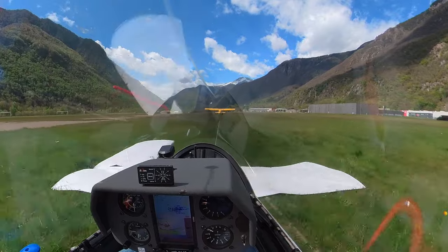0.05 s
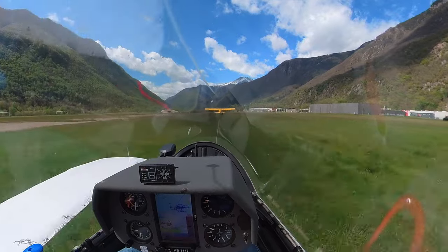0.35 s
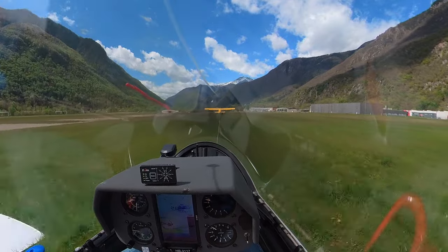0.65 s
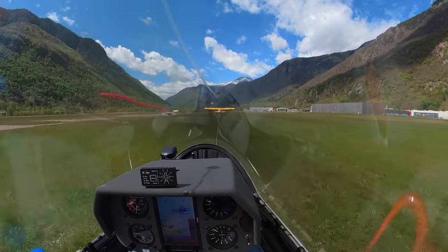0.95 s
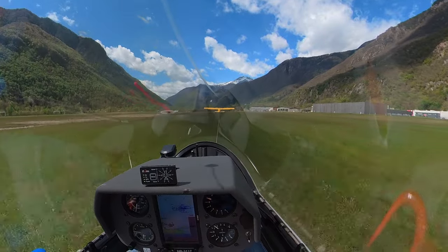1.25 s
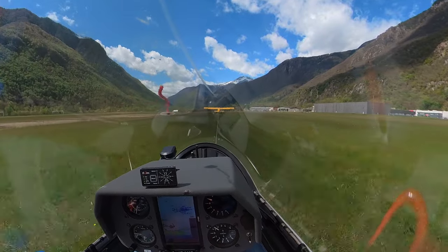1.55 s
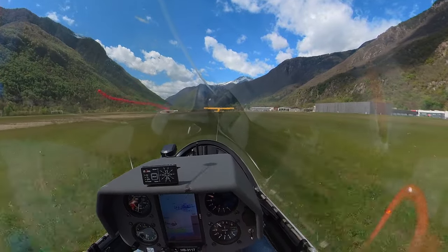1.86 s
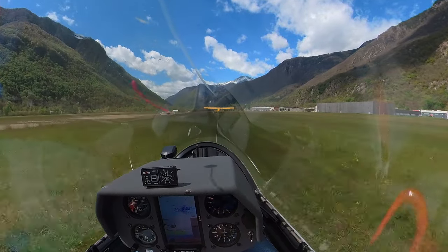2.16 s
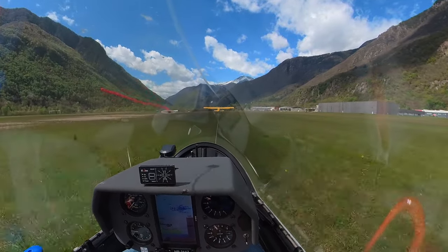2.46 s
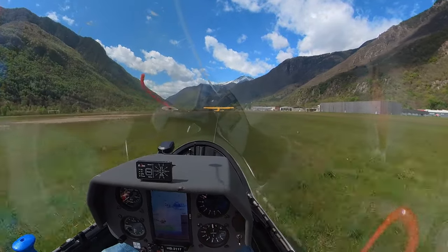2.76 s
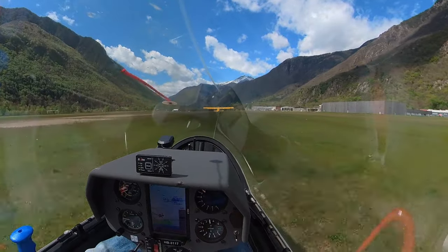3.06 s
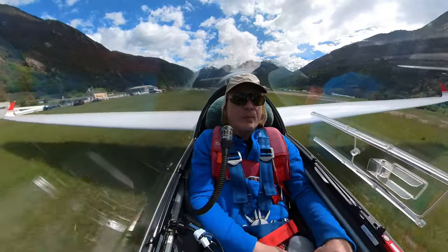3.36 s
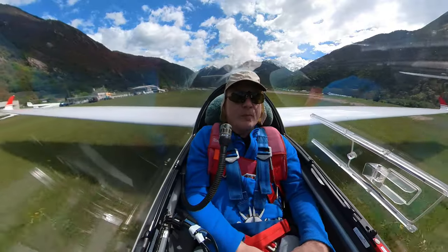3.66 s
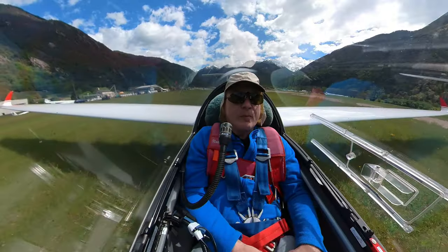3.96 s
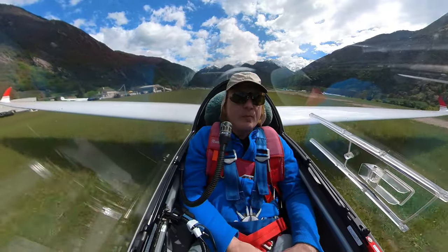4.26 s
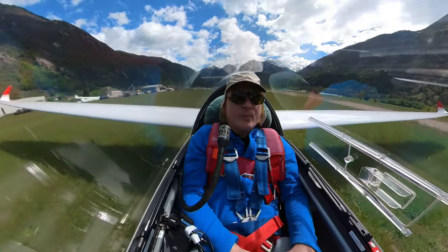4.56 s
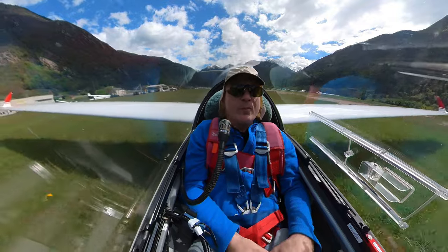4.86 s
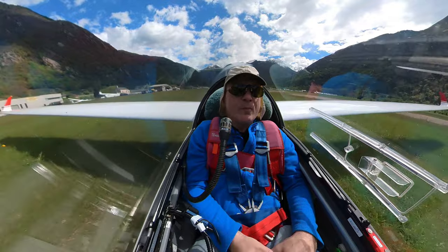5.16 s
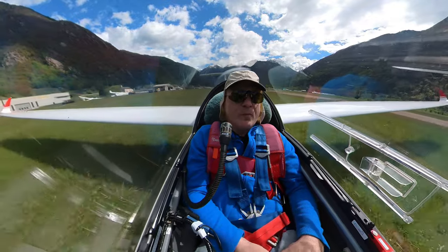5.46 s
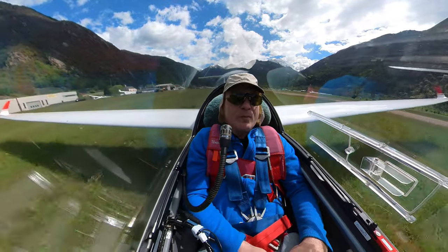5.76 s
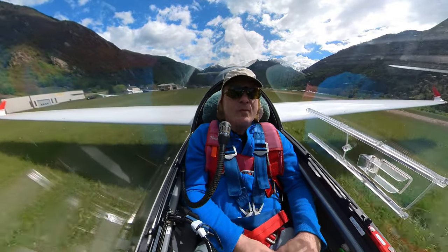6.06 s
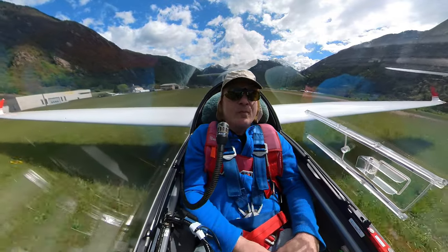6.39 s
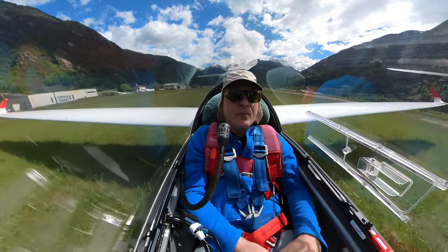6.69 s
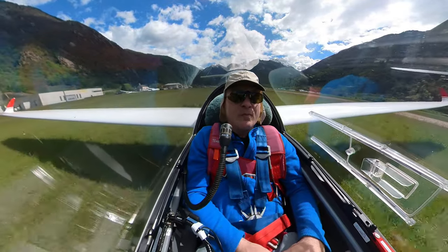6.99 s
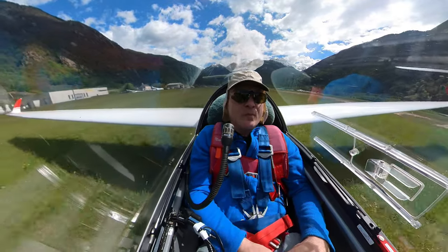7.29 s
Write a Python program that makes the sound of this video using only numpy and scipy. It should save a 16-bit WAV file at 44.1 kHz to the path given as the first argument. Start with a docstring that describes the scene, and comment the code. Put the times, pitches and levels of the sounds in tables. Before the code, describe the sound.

A glider's wheel rumbles and thumps across turf, heard close up from within the closed cockpit. At first the thin body booms while loose trim clatters and metal parts buzz and jingle. A little before halfway the tone becomes hollow, and hard knocks from ruts come thick and fast. Irregular clacks and rattles carry on to the end over a soft airflow that rises a little with speed.

```python
"""A glider's wheel rolls over a grass airfield and shakes the hollow body, which booms and rumbles.
We listen from inside the closed cockpit while the glider is towed. The tyre bounces in ruts,
panels and linkages clack and shake on the bumps, small metal fittings jingle, and the air
rushes more as speed builds. From about three seconds on, the sound is doubled
a few milliseconds late and turns hollow."""
import sys
import numpy as np
from scipy import signal
from scipy.fft import rfft, irfft, next_fast_len
from scipy.io import wavfile
from scipy.ndimage import uniform_filter1d, map_coordinates

SR = 44100
rng = np.random.default_rng(int(sys.argv[2]) if len(sys.argv) > 2 else 0)


def store_pcm(level_fs):
    """Save levels as 16-bit WAV."""
    pcm = np.round(np.clip(level_fs, -1, 1) * 32767).astype(np.int16)
    wavfile.write(sys.argv[1], SR, np.atleast_2d(pcm).T)


N = 323253
CONTACT_S = 0.001  # how quickly a hard touch builds up

# Tone colours, from low to high. Each row: frequency in Hz, relative level in dB.
AIR_TONE = [(100, -4.5), (400, 6.5), (1000, -7.5), (2000, -17.5), (4000, -29), (7000, -45)]  # air over the canopy
JINGLE_TONE = [(2000, -14.5), (3900, -11), (4400, -6), (5200, -11.5), (6100, -8.5), (6900, 0), (7500, -4),
               (9000, -10)]  # small metal parts
ROD_TONE = [(400, -7.5), (700, 11), (1200, -3), (1800, -17), (2700, -8), (3100, -3), (3600, -16),
            (4100, -28.5), (8000, -45)]  # a buzzing control rod
PANEL_TONE = [(300, -26.5), (700, 2.5), (1300, 5), (1600, -1), (2050, 1.5), (2600, -4.5), (3000, -4),
              (4000, -22), (5500, -37.5), (7000, -39)]  # loose panels and trim
KNOCK_TONE = [(150, -32), (350, 3), (650, -6.5), (950, -20.5), (1500, -26.5), (4000, -47.5)]  # the low part of a clack
CLACK_TONE = [(500, -4), (950, 0.5), (1300, 1), (1550, 0), (2050, 5.5), (2500, -3), (3000, -6.5),
              (3550, -6), (4200, -26.5), (9000, -33.5)]  # its middle
SNAP_TONE = [(2000, -22), (3800, 4), (4600, 3), (5500, 1.5), (6800, -2), (9000, -2)]  # its bright top
SHELL_TONE = [(170, -38), (280, 3), (350, -1.5), (480, 1.5), (540, -8), (650, -7), (800, -14.5),
              (1000, -22), (1500, -32.5), (4000, -46)]  # the glider's thin shell
SHELL_RING_TONE = [(270, -18), (322, -0.5), (385, -24.5), (700, -100)]  # the shell's main resonance
HEAVE_TONE = [(8, -23.5), (18, 9), (26, 23.5), (33, 16.5), (41, 31.5), (49, 9), (75, -62.5)]  # the whole airframe moving slowly
THUMP_TONE = [(40, -20.5), (65, 3.5), (85, -5), (105, -1.5), (140, 2), (155, -2), (178, -0.5), (195, -8),
              (220, -10.5), (260, -19), (330, -36), (600, -92.5)]  # the wheel thumping the hull
MICROPHONE_TONE = [(6900, 0), (7600, -7.5), (8400, -16), (9400, -27.5)]  # the microphone's fading treble

# The notes a struck part rings with. Each row: pitch in Hz, level in dB, seconds to fade by 60 dB.
COVER_NOTES = [(830, 1.5, 0.057), (1250, 4, 0.028), (1850, -0.5, 0.025), (2070, -10, .025),
               (2330, -4.5, .022), (2900, -9.5, 0.03), (3550, -8.5, 0.041)]
ROD_NOTES = [(668, 5, 0.16), (1164, 4, 0.088), (2620, -18, .07), (2940, -12, 0.05), (3370, -9, 0.05)]
PANEL_NOTES = [(628, 2.5, 0.13), (891.5, -2.5, 0.28), (1234, -1.5, 0.071), (1920, -10.5, 0.074),
               (2090, -5.5, 0.026), (2400, -12, 0.03), (2780, -6.5, 0.077), (3600, -10, 0.091)]
HULL_NOTES = [(104, -7.5, 0.024), (150, -6, 0.53), (168, 4.5, 0.045), (213.3, -5.5, 0.17), (305, -3, 0.052),
              (485.4, -12.5, 0.16)]

# How loud the lasting sounds are. Each row: time in seconds, level in dB.
AIR_LEVELS = [(0, -62.5), (1.5, -60.5), (3.2, -59.5), (5, -55), (7.3, -57)]
BOOM_LEVELS = [(0.0, -26.5), (0.35, -21), (0.42, -47), (0.52, -24.5), (0.74, -21), (0.77, -46), (0.87, -25),
               (1.58, -23), (1.65, -37), (1.89, -17.5), (1.93, -34), (2.11, -20), (2.21, -32.5), (2.3, -19),
               (2.35, -55), (2.42, -24), (2.47, -42), (2.61, -22), (2.71, -36), (3.12, -24.5)]
HEAVE_LEVELS = [(0, -30), (0.55, -30.5), (0.85, -35), (1, -30.5), (1.5, -47), (1.8, -37.5), (3.6, -32.5),
                (3.85, -30), (4.35, -42), (4.55, -23), (4.76, -65), (4.95, -26), (5.13, -36), (5.45, -26.5),
                (5.7, -38.5), (6.7, -42), (7.05, -30.5), (7.3, -46)]

# Single hits on small parts. Each row: start in seconds, level in dB.
CATCH_TICKS = [(5.903, -45), (5.916, -40)]
FITTING_HITS = [(0.246, -50), (0.464, -43.5), (0.49, -48.5), (0.553, -45.5), (0.7, -59), (0.74, -53),
                (1.087, -38), (1.112, -58), (1.387, -47), (1.766, -49), (3.184, -50.5), (3.207, -54),
                (3.675, -53.5), (4.43, -48), (4.859, -48.5), (4.956, -50.5), (5.311, -47.5), (6.732, -47),
                (6.817, -48.5), (7.055, -63)]
ROD_BUZZES = [(0.226, -36.5), (0.938, -33)]
# A loose cover clatters in runs. Each row: start in seconds, length in seconds, level in dB.
COVER_RUNS = [(0.591, .1, -48.5), (1.859, .035, -43.5), (2.026, .04, -60), (2.128, .018, -43),
              (2.447, .07, -45), (2.558, .03, -35.5), (2.595, .085, -45.5), (2.781, .05, -44),
              (2.885, .03, -57)]
# The loose gear shakes. Each row: start and length in seconds, panel and hard-part levels in dB.
GEAR_SHAKES = [(0.588, 0.17, -70, -73.5), (1.005, .1, -60, -61.5), (2.027, 0.051, -56, -59),
               (2.235, .11, -60.5, -66.5), (2.351, 0.13, -59, -67.5), (2.511, .07, -53.5, -60),
               (2.738, 0.29, -60, -67.5), (3.66, .13, -62.5, -64.5), (4.113, 0.15, -54.5, -64.5),
               (4.409, 0.099, -51.5, -60), (4.555, 0.1, -59, -63.5), (4.823, .16, -56.5, -60.5),
               (5.166, 0.07, -58, -62.5), (5.34, 0.16, -54, -59.5), (5.581, 0.068, -59, -65.5),
               (6.36, 0.13, -58.5, -71.5), (7.008, 0.084, -50.5, -54), (7.152, 0.17, -67.5, -64.5)]
# The loudest clacks of panels and linkages.
# Each row: start in seconds, level in dB, then the dB added to that for the knock and for the snap.
LOUD_CLACKS = [(0.159, -48.5, 22, 0), (0.188, -32.5, -9, -7.5), (0.308, -51, 10.5, -19),
               (0.492, -51.5, 24.5, -13), (0.8634, -44, -11, -4.5), (0.9365, -36, 0, -6),
               (0.953, -40.5, 19, -27), (0.986, -33.5, 14, -8), (1.006, -30.5, 9, -6),
               (1.021, -34.5, -3, -12), (1.0547, -30.5, 4, -12.5), (1.0704, -35, 8, -19),
               (1.141, -46.5, 23, -20), (1.1544, -49, 21, -29), (1.171, -36.5, 8.5, -20),
               (1.276, -46, 20, -37), (1.3427, -44, 17, -17), (1.4601, -47, -7, 0), (1.5963, -40, -18, -3),
               (1.6324, -34.5, 6, -10), (1.7245, -41, 6, -6), (1.8724, -41, 15.5, -20),
               (1.935, -45.5, 13, -12), (1.9919, -42, 6, -24), (2.0426, -43, 2.5, -11),
               (2.1023, -39.5, 17, -12), (2.261, -43, 13, -22), (2.299, -45.5, -4, -5),
               (2.324, -48.5, 1, -7), (2.404, -36.5, 8.5, -9), (2.4795, -47, 25.5, -23),
               (2.5331, -35.5, 13, -15), (2.808, -40.5, 5, -9), (2.941, -43, 18.5, -5.5),
               (3.049, -37, 12, -14.5), (3.2013, -36, 10, -18), (3.2904, -37.5, 15.5, -18),
               (3.3862, -43, 17, -8), (3.413, -41, 21, -27), (3.425, -38, -4, -12),
               (3.5384, -39, 15.5, -6.5), (3.7236, -32.5, 5, -13), (3.9, -45, 11.5, -7),
               (4.065, -40.5, 12, -26), (4.1754, -31, -11, -9), (4.2169, -37.5, 9.5, -19),
               (4.5017, -27, 10, -7.5), (4.9347, -39, 1, -21), (5.3844, -38, 18, -21),
               (5.5214, -43.5, 18, -10), (5.678, -28.5, 6, -12), (5.7244, -46, -5, 1),
               (5.8794, -46.5, 20.5, -9), (5.9754, -41.5, 18, -15), (6.1722, -49.5, 25.5, -18),
               (6.444, -48.5, 24, -19), (6.4911, -41, 15, -22), (6.779, -35.5, 2, -15),
               (6.858, -41.5, 6, -15.5), (7.0586, -40.5, 14, -14), (7.221, -38.5, -1, -16.5)]

# Rolling on even turf. Each row: time in seconds, thump level in dB, rattle level in dB.
EVEN_ROLLING = [(0, -32, -70), (1.5, -29.5, -70), (3.1, -28, -70.5), (4.7, -32.5, -67), (5.6, -28.5, -69),
                (6.3, -28.5, -72), (7.3, -30.5, -64.5)]
# The wheel runs over bumps. Each row: start and length in seconds, thump and rattle levels in dB.
WHEEL_BUMPS = [(0.173, 0.074, -30, -69), (0.431, 0.11, -27, -69), (0.584, .11, -27.5, -58.5),
               (0.929, 0.19, -42, -62), (1.101, 0.14, -35, -71.5), (1.362, 0.029, -31, -68.5),
               (1.576, 0.12, -36, -60), (1.712, 0.12, -31.5, -67), (1.918, 0.25, -32, -65.5),
               (2.276, 0.2, -29, -66.5), (2.478, 0.067, -26.5, -62.5), (2.779, 0.12, -25, -71.5),
               (2.93, 0.13, -41, -61.5), (3.147, 0.11, -29, -65.5), (3.362, 0.066, -33, -73.5),
               (3.685, 0.054, -25.5, -59), (4.126, 0.14, -28.5, -59.5), (4.413, .1, -31.5, -54.5),
               (4.559, 0.078, -27.5, -71.5), (4.801, .15, -26, -60.5), (5.231, 0.067, -30, -75.5),
               (5.358, 0.11, -30.5, -59.5), (5.523, 0.22, -49, -64.5), (5.853, 0.072, -29, -61.5),
               (6.064, 0.078, -33, -63), (6.339, 0.18, -36, -68), (6.676, 0.14, -31.5, -65),
               (7.034, 0.033, -25.5, -54), (7.23, 0.098, -26.5, -69.5)]
# The wheel goes light for a moment. Each row: middle and half length in seconds, dip in dB.
WHEEL_SKIPS = [(0.408, 0.029, -5.5), (1.455, 0.029, -4), (1.896, 0.03, -3.5), (2.171, 0.023, -3),
               (2.672, .03, -2.5), (3.249, 0.016, -5.5), (3.614, 0.067, -1.5), (4.35, 0.026, -3),
               (4.768, 0.028, -5.5), (5.17, 0.016, -5.5), (6, 0.039, -1), (6.627, 0.028, -8)]
# The wheel drops into ruts.
# Each row: start in seconds, hull knock in dB, tyre bounce in dB, bounce pitch in Hz.
WHEEL_RUTS = [(0.447, -41, -29, 131.6), (1.064, -23.5, -36, 120), (2.798, -34, -22.5, 145),
              (3.426, -27, -21, 111.6), (3.695, -26.5, -18.5, 109), (4.005, -26, -18, 107.6),
              (4.507, -16.5, -20.5, 126), (4.814, -20.5, -19, 105), (4.941, -26.5, -15, 79.3),
              (5.235, -25.5, -18.5, 118), (5.261, -32, -21.5, 200), (5.389, -28, -18.5, 109.5),
              (5.545, -25, -24, 195), (6.105, -23, -22.5, 95.6), (6.282, -34, -23.5, 101.4),
              (6.355, -32, -19.5, 127), (6.443, -20.5, -26.5, 181), (6.485, -36, -18, 126),
              (6.672, -17.5, -17.5, 139.7), (6.762, -21.5, -21, 201), (7.062, -19, -30, 312),
              (7.084, -27.5, -17.5, 114.3)]


def amp(db):
    """Turn decibels into a number to multiply by."""
    return 10 ** (np.asarray(db) / 20)


def unit(x):
    """Scale a signal to an average strength (rms) of 1."""
    return x / np.sqrt(np.mean(x ** 2) + 1e-20)


def curves(rows):
    """Join a table's points with lines: one curve for each column after the time."""
    times, *columns = np.transpose(rows)
    return [np.interp(np.arange(N) / SR, times, column) for column in columns]


def wobble(rate):
    """A smooth curve through rate random points a second."""
    points = rng.standard_normal(int(N * rate / SR) + 4)
    return map_coordinates(points, [np.arange(N) * rate / SR])


def gains(tone):
    """Turn a tone colour into a function that gives the gain at any frequency."""
    freqs, db = np.transpose(tone)
    return lambda hz: amp(np.interp(np.log(hz + 1), np.log(freqs), db))


def filtered(x, response):
    """Turn each frequency in x up or down by the gain that response gives."""
    size = next_fast_len(N + SR // 2)
    return irfft(rfft(x, size) * response(np.fft.rfftfreq(size, 1 / SR)), size)[:N]


def noise(tone):
    """Steady noise with the given tone colour."""
    return unit(filtered(rng.standard_normal(N), gains(tone)))


def contact_noise(tone, colour_db=3):
    """Noise whose colour keeps shifting, as from one touching part to the next."""
    spectrum = signal.stft(rng.standard_normal(N), nperseg=256)[2]
    patches = uniform_filter1d(rng.standard_normal(spectrum.shape), size=3, axis=0)
    patches = uniform_filter1d(patches, size=9, axis=1)
    colour = amp(colour_db * np.clip(unit(patches), -2, 2))
    shifting = signal.istft(spectrum * colour, nperseg=256)[1][:N]
    return unit(filtered(shifting, gains(tone)))


def sustained(x, span):
    """Even out a vibration's strength over span seconds."""
    size = max(int(span * SR), 3)
    power = uniform_filter1d(uniform_filter1d(x ** 2, size), size)
    return x / np.sqrt(np.abs(power) + 0.00078)


def add(track, start, sound):
    """Mix a sound into the track at start seconds."""
    part = track[max(round(start * SR), 0):][:len(sound)]
    part += sound[:len(part)]


def strike(t, attack, t60):
    """The loudness of a blow: a quick rise, then a fall of 60 dB every t60 seconds."""
    return (1 - np.exp(-t / attack)) * amp(-60 * t / t60)


def ring(notes, attack):
    """One blow on a part rings all its notes, each at a random strength."""
    t = np.arange(SR // 6) / SR
    sound = np.zeros(len(t))
    for hz, db, t60 in notes:
        loudness = amp(db) * (0.5 + rng.random()) * strike(t, attack, t60)
        sound += loudness * np.sin(2 * np.pi * (hz * t + rng.random()))
    return sound


def jolts(rate, spread_db, t60, steady):
    """The loudness of small random blows, rate a second, on top of a steady share."""
    blows = (rng.random(N) < rate / SR) * amp(spread_db * np.clip(rng.standard_normal(N), -2, 2))
    one_blow = strike(np.arange(SR // 5) / SR, 0.00064, t60)
    energy = np.abs(signal.fftconvolve(blows ** 2, one_blow ** 2)[:N])
    return unit(np.sqrt(energy / energy.mean() + steady))


def air():
    """Air streams over the canopy, louder as the glider gathers speed."""
    return amp(curves(AIR_LEVELS)[0] + 0.9 * wobble(5.9)) * noise(AIR_TONE)


def catch():
    """A small hard catch gives thin, dry ticks."""
    t = np.arange(SR // 20) / SR
    ticks = np.zeros(N)
    for start, db in CATCH_TICKS:
        add(ticks, start - CONTACT_S, amp(db) * strike(t, CONTACT_S / 2, t60=0.0099))
    return ticks * noise(JINGLE_TONE)


def cover(taps_per_s=51.4):
    """A loose, hollow cover clatters in runs of uneven dry taps."""
    t = np.arange(SR // 6) / SR
    ringing, ticks = np.zeros((2, N))
    for start, length, db in COVER_RUNS:
        for k, (late, size) in enumerate(rng.standard_normal((8, 2))):
            if k < length * taps_per_s:
                at = start + (k + 0.22 * late) / taps_per_s
                tap_db = db + 3 * np.clip(size, -1, 1)
                add(ringing, at, amp(tap_db - 12) * ring(COVER_NOTES, attack=CONTACT_S / 2))
                add(ticks, at, amp(tap_db - 9) * strike(t, CONTACT_S / 2, t60=0.011))
    return ringing + ticks * noise(CLACK_TONE)


def metal_parts(jingle_hz=6870, gap_s=0.01, loss_db=7):
    """Fittings bounce three times, ringing faintly; a hollow control rod buzzes in its guide."""
    t = np.arange(SR // 4) / SR
    jingle, ringing, rod = np.zeros((3, N))
    for start, db in FITTING_HITS:
        for k, (late, detune) in enumerate(rng.standard_normal((3, 2))):
            at = start + gap_s * (k + np.tanh(late) * k / 10)
            touch_db = db - loss_db * k
            note = (jingle_hz * (1 + 0.03 * detune), 0, 0.05)
            add(jingle, at - CONTACT_S, amp(touch_db - 5) * strike(t, 0.003, t60=0.05))
            add(ringing, at, amp(touch_db - 12) * ring([note], attack=2 * CONTACT_S))
    for start, db in ROD_BUZZES:
        add(rod, start, amp(db - 1) * strike(t, 0.0075, t60=0.11))
        add(ringing, start, amp(db - 14) * ring(ROD_NOTES, attack=0.0045))
    sound = jingle * contact_noise(JINGLE_TONE) + ringing + rod * noise(ROD_TONE)
    return sound * amp(2.5 * wobble(500))  # a fast flicker roughens it


def loose_gear():
    """Rough ground shakes all the loose gear: countless touches swell into a clatter and die down."""
    t = np.arange(N) / SR
    panels, hard_parts = np.zeros((2, N))
    for start, length, panel_db, hard_db in GEAR_SHAKES:
        swell = np.sin(np.pi * np.clip((t - start) / length, 0, 1))
        panels += amp(panel_db) * swell
        hard_parts += amp(hard_db) * swell
    touches = jolts(rate=330, spread_db=4, t60=0.018, steady=0.16)
    return touches * (panels * contact_noise(PANEL_TONE) + hard_parts * contact_noise(SNAP_TONE))


def trim_chatter(rattle_db, taps_per_s=52):
    """Loose trim hops about once per cycle of the boom; small hard parts scratch in between."""
    hop_count = np.floor(np.cumsum(taps_per_s * np.exp(0.23 * wobble(40))) / SR)
    landings = np.diff(hop_count, prepend=0) * amp(4.6 * np.clip(wobble(45), -1.5, 1.5))
    one_tap = strike(np.arange(SR // 5) / SR, CONTACT_S, t60=0.045)
    taps = signal.fftconvolve(landings, one_tap)[:N]
    trim = amp(rattle_db - 0.5) * unit(unit(taps) + 0.14) * contact_noise(PANEL_TONE)
    scratches = jolts(rate=110, spread_db=3, t60=0.06, steady=0.12) * contact_noise(SNAP_TONE)
    scratch_db = -74 + 0.6 * (rattle_db - rattle_db.mean())
    return trim + amp(scratch_db) * scratches


def light_clacks(rattle_db, clacks_per_s=2.2, tries=120):
    """Rows like LOUD_CLACKS for light touches at random moments, stronger where the ride is rough."""
    rows = []
    for when, chance, softness, knock, snap in rng.random((tries, 5)):
        if chance * tries < clacks_per_s * N / SR:
            rough_db = rattle_db[int(when * N)] - rattle_db.mean()
            db = -49 + 0.24 * rough_db - 10 * softness
            rows.append((when * N / SR, db, 9 + 12 * knock, -31 + 22 * snap))
    return rows


def clacks(rattle_db, rebound=0.16, gap_s=0.0045):
    """Each panel or linkage cracks, knocks, snaps and rings at its own pitch, then falls back once."""
    t = np.arange(SR // 6) / SR
    knock, clack, snap, ringing = np.zeros((4, N))
    buzz = amp(1.2 * wobble(350))  # the surfaces touch many times within a clack
    knock_noise = sustained(noise(KNOCK_TONE), span=0.008)
    clack_noise, snap_noise = contact_noise(CLACK_TONE), contact_noise(SNAP_TONE)
    for start, db, knock_db, snap_db in list(LOUD_CLACKS) + light_clacks(rattle_db):
        hit_at = start - CONTACT_S
        rebound_at = start + gap_s * (0.5 + rng.random())
        fade_s = 0.042 * amp(0.05 * (db + 44.5))  # hard hits rattle on for longer
        add(knock, hit_at, amp(db + knock_db - 11.5) * strike(t, CONTACT_S, t60=0.09))
        add(clack, hit_at, amp(db - 9.5) * strike(t, CONTACT_S / 2, t60=0.002))  # the first crack
        for at, size in [(hit_at, 1), (rebound_at, rebound)]:
            add(clack, at, size * amp(db - 11) * strike(t, CONTACT_S, fade_s))
            add(snap, at, size * amp(db + snap_db - 6.5) * strike(t, CONTACT_S, 1.34 * fade_s))
        pitch = np.exp(0.056 * rng.standard_normal())
        notes = [(hz * pitch, level, t60) for hz, level, t60 in PANEL_NOTES]
        add(ringing, hit_at, amp(db - 15.5) * ring(notes, attack=CONTACT_S))
    return knock * knock_noise + ringing + buzz * (clack * clack_noise + snap * snap_noise)


def shell_ring(thump_db, growth_db_per_s=0.79):
    """Faster rolling stirs up the shell's main resonance, which swells with each bump."""
    level_db = thump_db - 27 + growth_db_per_s * np.arange(N) / SR
    return amp(level_db) * sustained(noise(SHELL_RING_TONE), span=0.096)


def ruts(bounce_rise_s=0.0098):
    """In a rut the tyre bounces a few times, while the knock rings the hull and thuds on the shell."""
    t = np.arange(SR // 4) / SR
    ringing, thud = np.zeros((2, N))
    bounce = t / bounce_rise_s * np.exp(1 - t / bounce_rise_s)
    for start, knock_db, bounce_db, bounce_hz in WHEEL_RUTS:
        add(ringing, start, amp(bounce_db) * bounce * np.sin(2 * np.pi * bounce_hz * t))
        add(ringing, start - 2 * CONTACT_S, amp(knock_db - 1) * ring(HULL_NOTES, attack=0.0041))
        add(thud, start, amp(knock_db - 9) * strike(t, 0.017, t60=0.1))
    return ringing + thud * noise(SHELL_TONE)


def cockpit_boom(centre_hz=56, width_hz=7.2):
    """The closed cockpit keeps ringing at its lowest natural pitch."""
    def resonance(hz):
        damping = 1j * hz * width_hz
        return (damping / (centre_hz ** 2 - hz ** 2 + damping)) ** 2

    boom = unit(filtered(rng.standard_normal(N), resonance))
    return amp(curves(BOOM_LEVELS)[0]) * sustained(boom, span=0.084)


def ride(thump_rise_s=0.0071, rattle_rise_s=0.054, settle_s=0.025):
    """Thump and rattle levels in dB: they swell on bumps and dip where the wheel goes light."""
    t = np.arange(N) / SR
    age = t[:SR // 2]
    thump_power, rattle_power = amp(curves(EVEN_ROLLING)) ** 2
    for start, length, thump_db, rattle_db in WHEEL_BUMPS:
        settle = np.exp(-np.maximum(age - length, 0) / settle_s)
        add(thump_power, start, (amp(thump_db) * np.clip(age / thump_rise_s, 0, 1) * settle) ** 2)
        # loose parts take longer to get going than the hull
        add(rattle_power, start, (amp(rattle_db) * np.clip(age / rattle_rise_s, 0, 1) * settle) ** 2)
    dip_db = sum(db * np.exp(-((t - middle) / half) ** 2) for middle, half, db in WHEEL_SKIPS)
    return 10 * np.log10([thump_power, rattle_power]) + dip_db


def wheel_rumble(thump_db, rattle_db, growth_db_per_s=0.46):
    """The wheel heaves the airframe, thumps the hull and drums the shell at every tuft of grass."""
    heave = amp(curves(HEAVE_LEVELS)[0]) * sustained(noise(HEAVE_TONE), span=0.17)
    tufts_db = 1.77 * wobble(22)
    thump = amp(thump_db + 1.75 + tufts_db) * sustained(noise(THUMP_TONE), span=0.043)
    drumming = noise(SHELL_TONE) * jolts(rate=95, spread_db=-0.5, t60=0.11, steady=0.63)
    speed_db = growth_db_per_s * np.arange(N) / SR  # the shell drums harder with speed
    shell_db = 0.49 * thump_db + 0.51 * rattle_db + 1 + speed_db
    return heave + thump + amp(shell_db) * sustained(drumming, span=0.08)


def scene():
    """Everything heard in the cockpit; the ride over the turf shakes the body and its loose parts."""
    thump_db, rattle_db = ride()
    body = wheel_rumble(thump_db, rattle_db) + shell_ring(thump_db) + cockpit_boom() + ruts()
    rush = air()
    rattles = loose_gear() + metal_parts() + trim_chatter(rattle_db) + clacks(rattle_db)
    return (body + rush + rattles + cover() + catch())[None]


def record(dry, double_from_s=3.15, lag_s=0.00929, copy_gain=0.84, top_hz=9500):
    """A late copy joins in, hollowing the sound and thinning the boom; the microphone dulls the top."""
    sound = dry[0]
    fade_in = np.clip((np.arange(N) / SR - double_from_s) / 0.027, 0, 1)
    late_copy = np.pad(sound, (round(lag_s * SR), 0))[:N]
    doubled = sound + fade_in * copy_gain * late_copy
    return filtered(doubled, lambda hz: gains(MICROPHONE_TONE)(hz) * (hz < top_hz))[None]


dry = scene()
out = record(dry)
store_pcm(out)
```